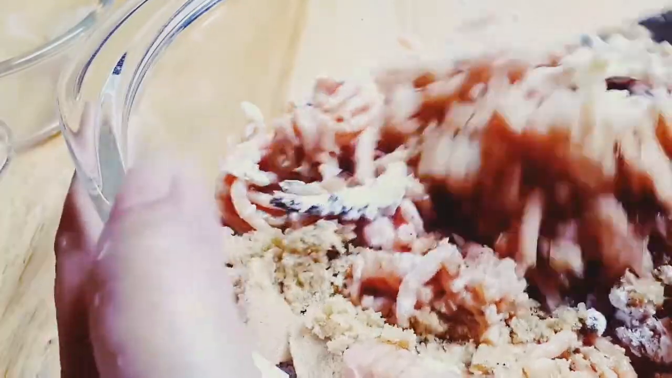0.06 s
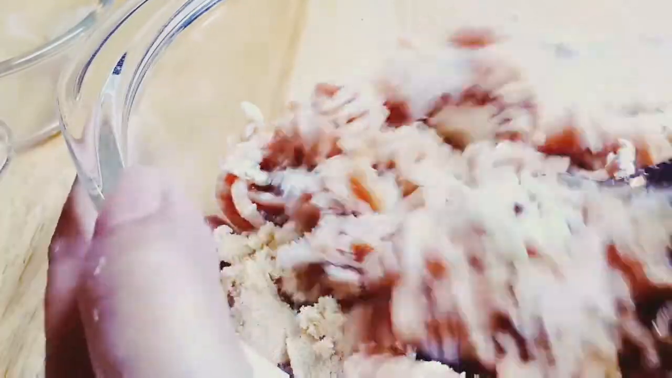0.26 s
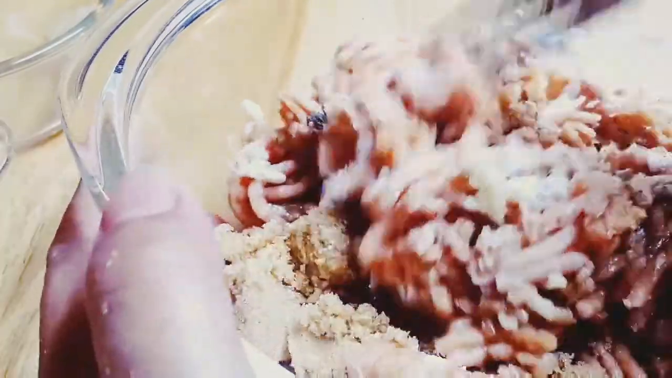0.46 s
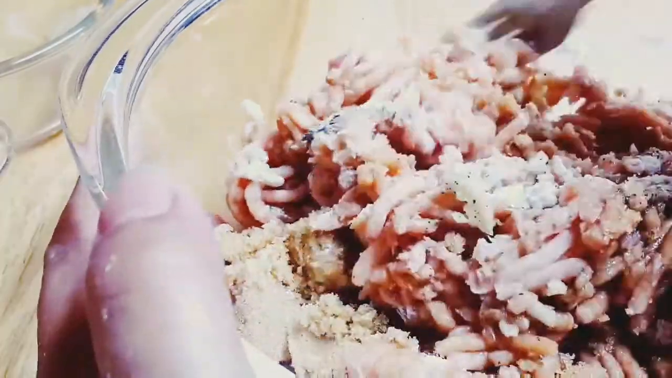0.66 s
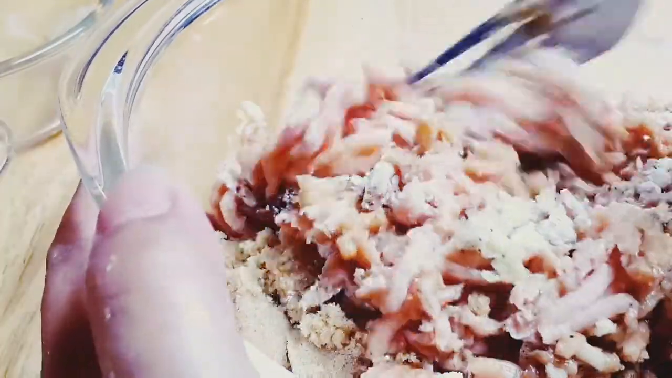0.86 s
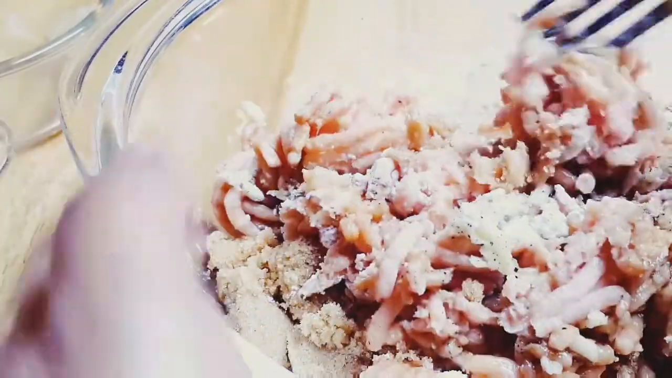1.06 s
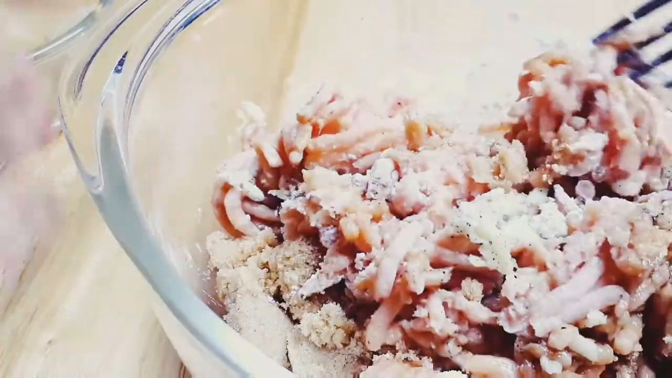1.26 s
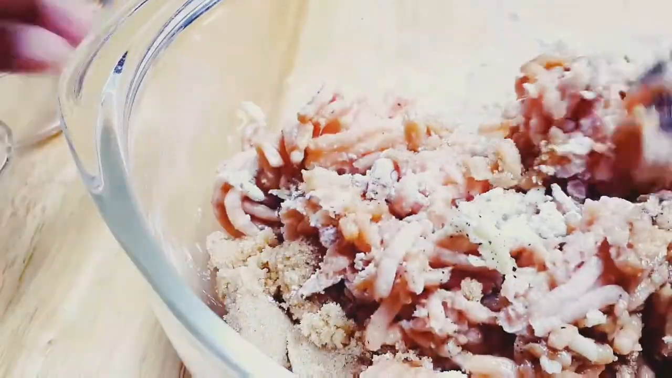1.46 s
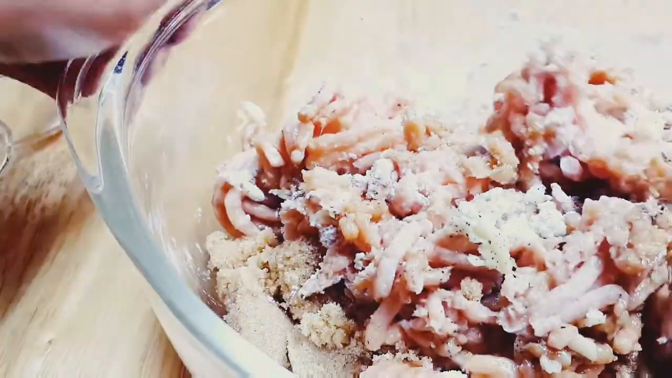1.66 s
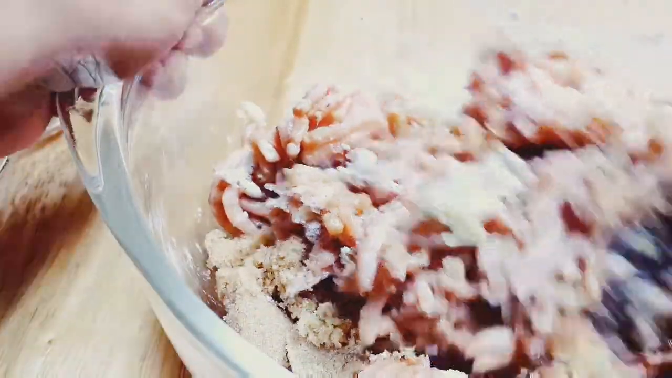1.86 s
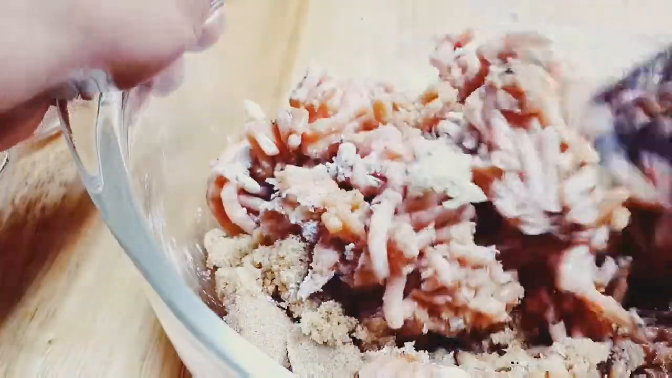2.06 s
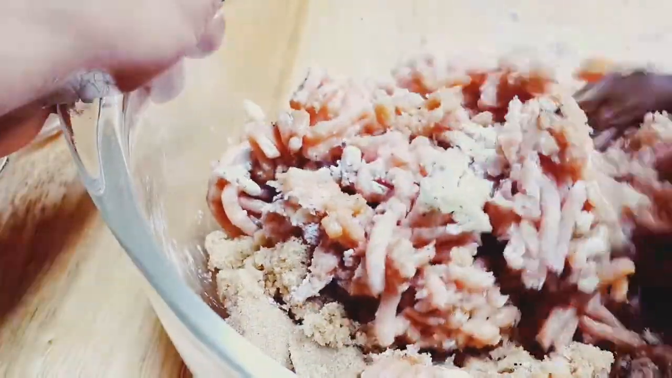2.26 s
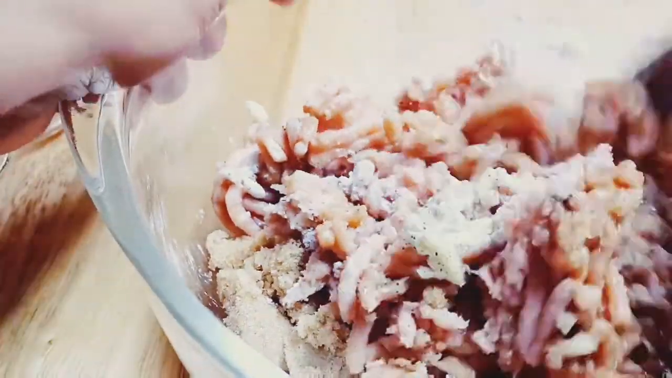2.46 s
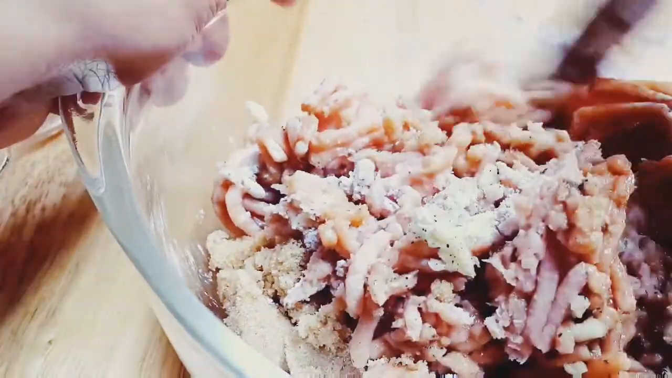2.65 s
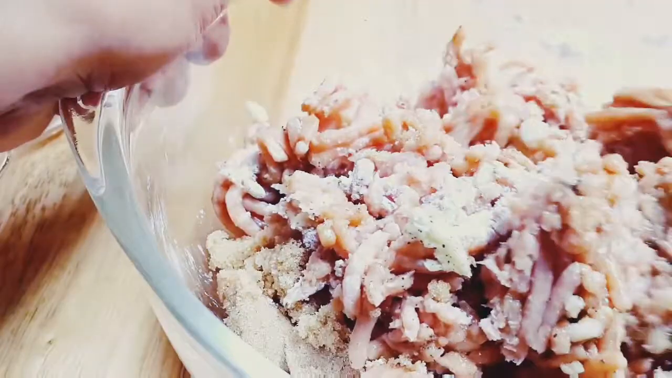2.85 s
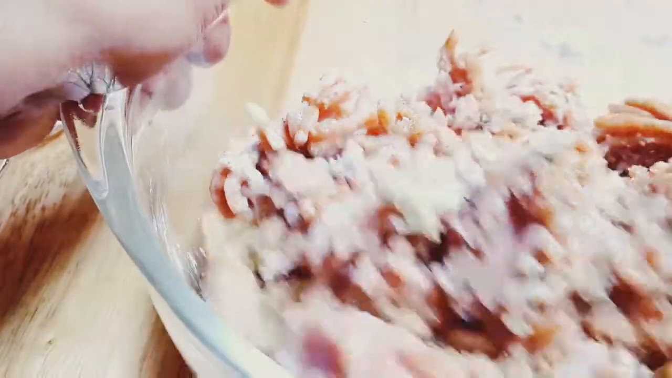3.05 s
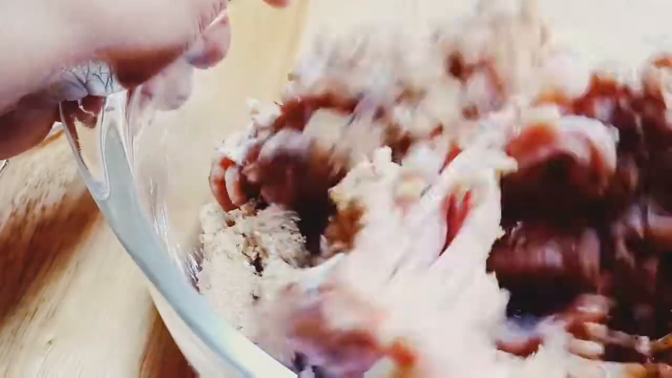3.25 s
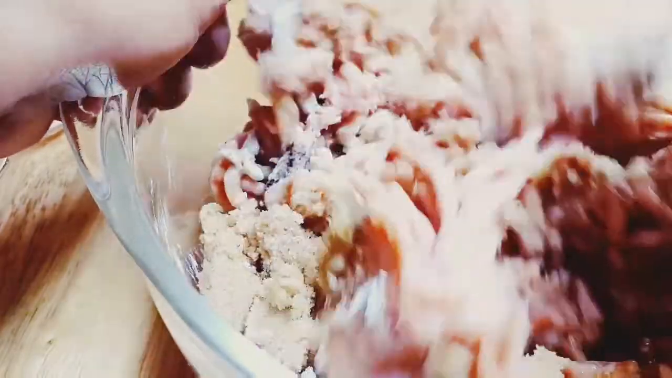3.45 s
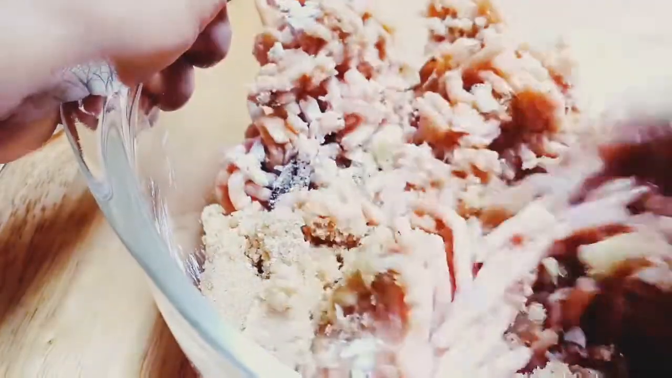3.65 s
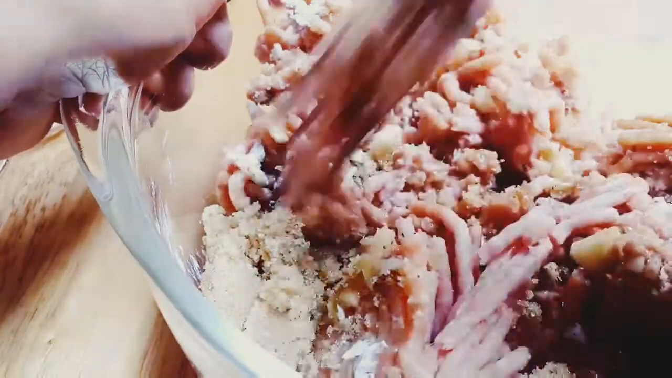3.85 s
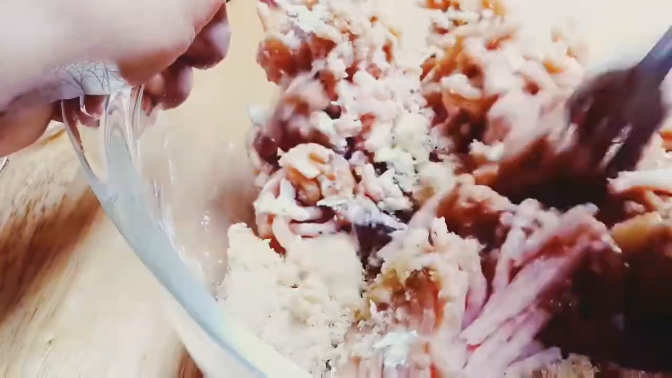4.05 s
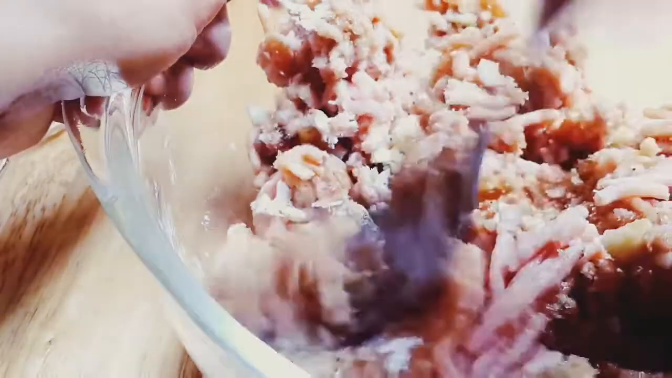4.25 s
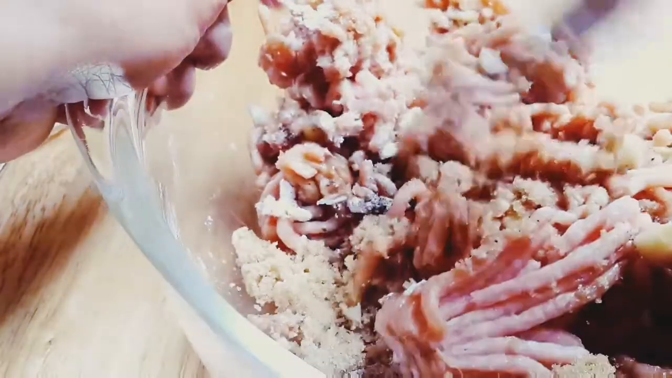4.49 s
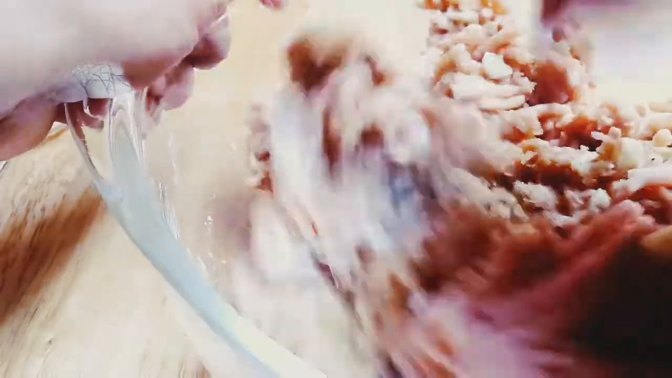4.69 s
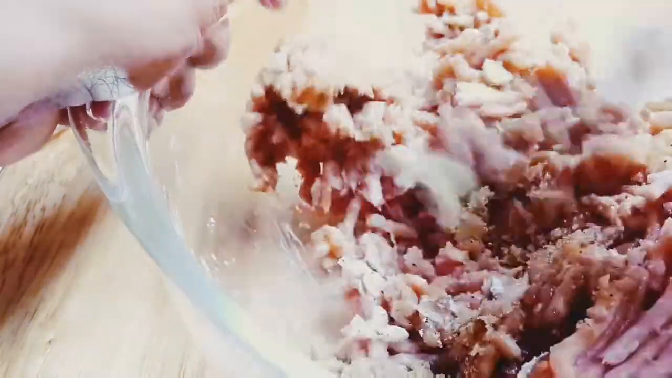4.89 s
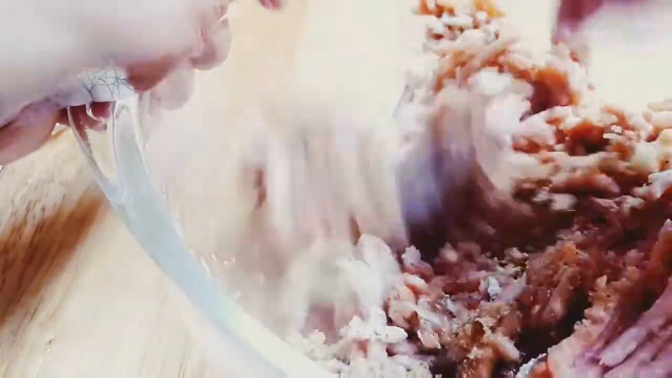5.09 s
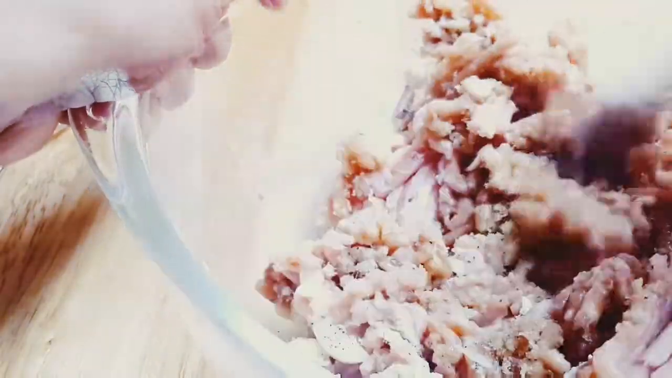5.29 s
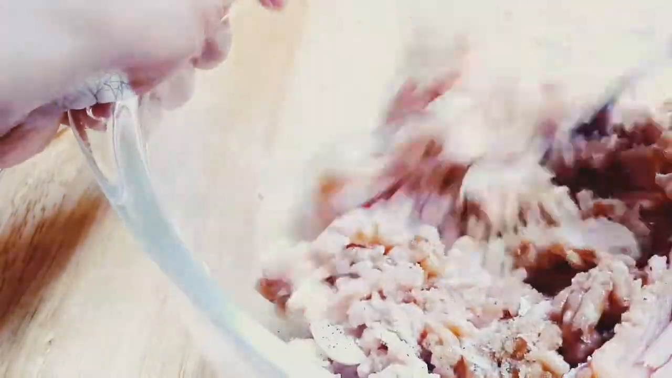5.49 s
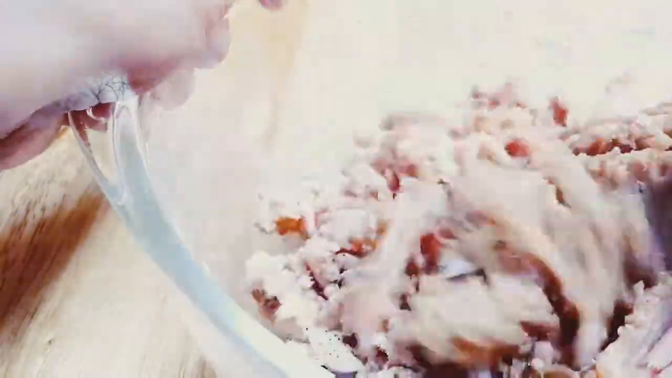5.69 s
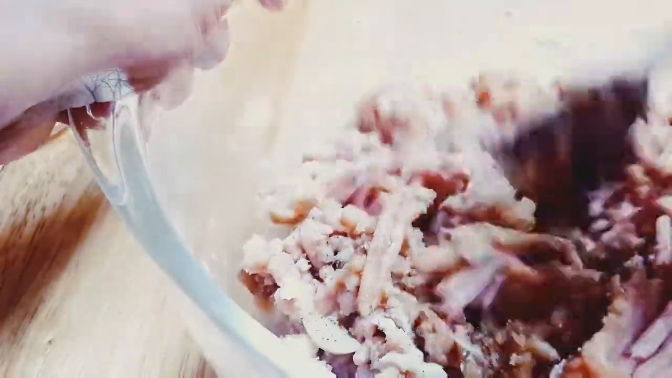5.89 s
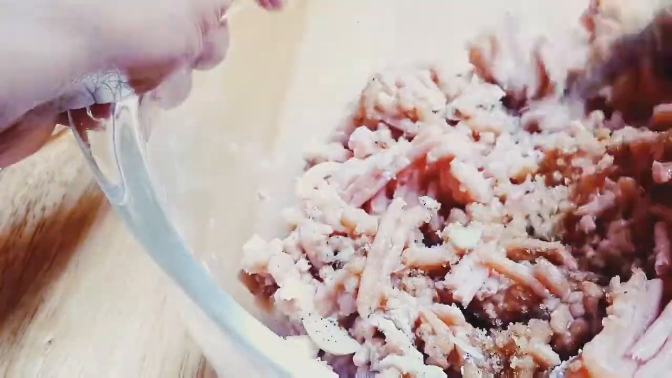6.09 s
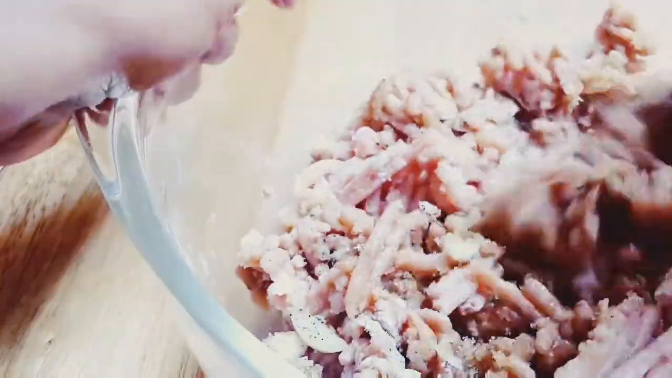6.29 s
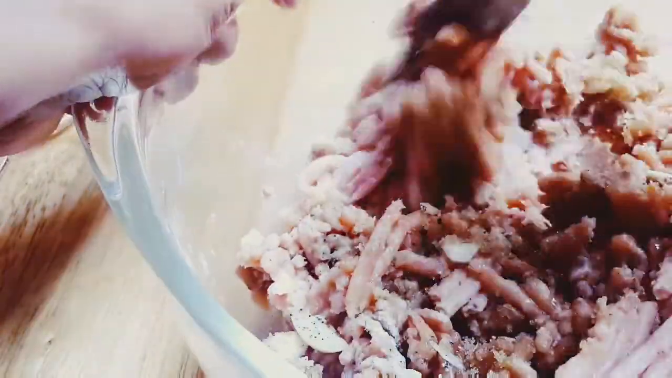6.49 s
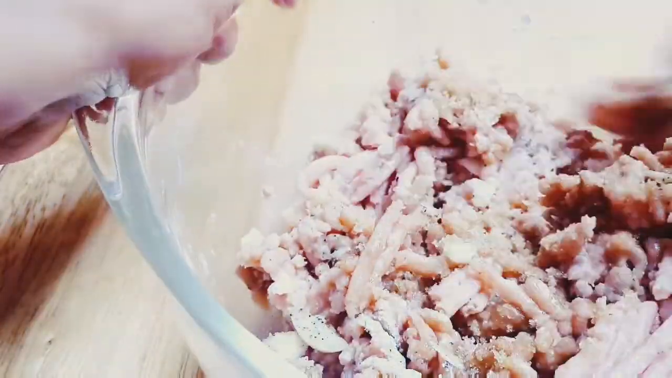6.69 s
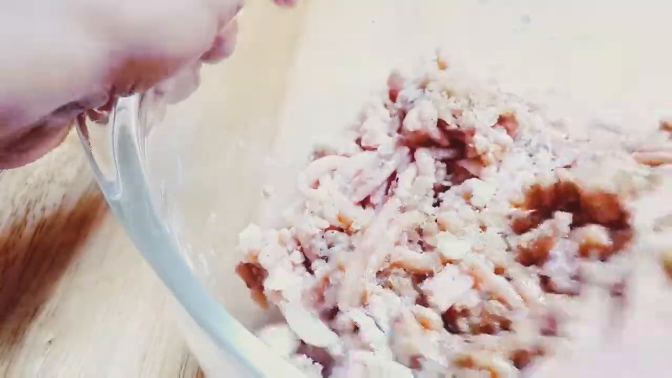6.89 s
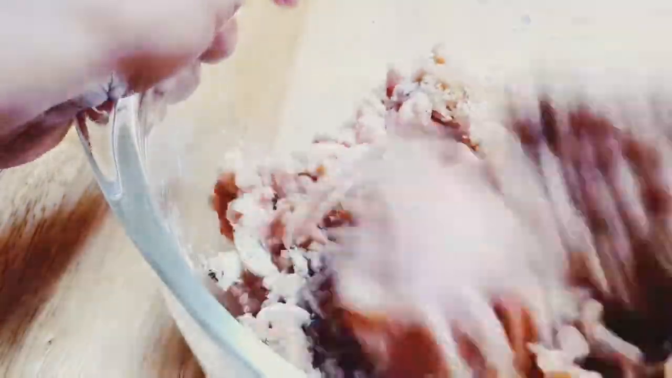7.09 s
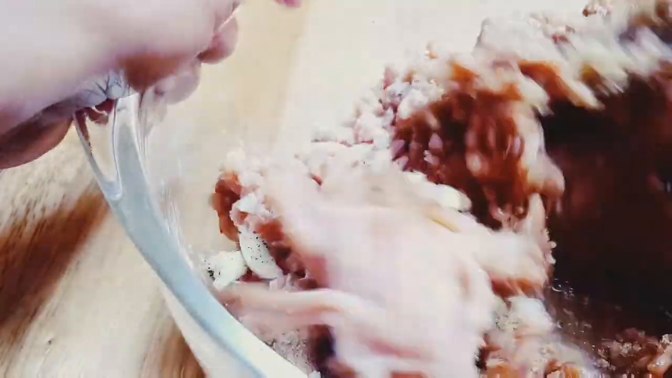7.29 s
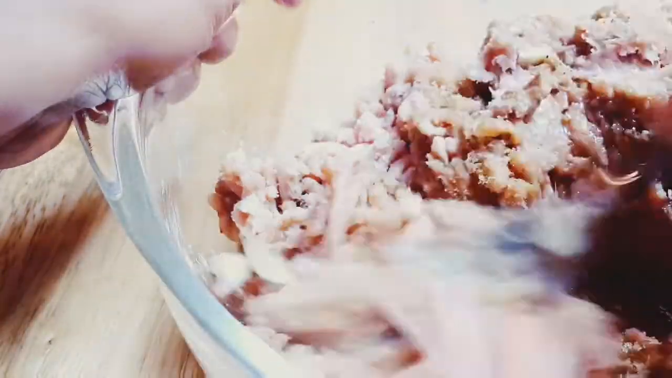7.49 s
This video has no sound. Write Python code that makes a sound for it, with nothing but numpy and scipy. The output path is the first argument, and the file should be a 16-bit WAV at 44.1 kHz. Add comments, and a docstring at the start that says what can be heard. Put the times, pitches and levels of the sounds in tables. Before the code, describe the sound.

Close up in a small, quiet kitchen, a fork stirs wet ground meat in a glass bowl. Uneven strokes make sticky crackles, soft squishes and tiny wet snaps. Through the middle the fork strikes the glass several times, once with a clear ring, and the bowl knocks dully on the wooden table. The squelching grows busier near the end, over a very faint appliance hum.

```python
"""Fork mixing wet mince in a glass bowl

A hand steadies the bowl on a wooden table in a small kitchen. Each stroke crackles as sticky strands
part, snaps wet films and squeezes air out of the meat. The tines click and scrape on the glass, and
the bowl knocks and groans against the wood. An appliance hums faintly behind it all."""
import sys
import numpy as np
from scipy import signal
from scipy.fft import rfft, irfft
from scipy.io import wavfile
from scipy.ndimage import uniform_filter1d

SR = 44100
rng = np.random.default_rng(int(sys.argv[2]) if len(sys.argv) > 2 else 0)


def waveform_to_disk(signal):
    """Save audio, clipped to [-1, 1], as 16-bit WAV at the path in sys.argv[1]."""
    frames = np.transpose(np.atleast_2d(signal))
    scaled = np.clip(frames, -1, 1) * 32767
    samples = np.round(scaled).astype(np.int16)
    wavfile.write(sys.argv[1], SR, samples)


N = 332514
CUTOFF_HZ = 16100

# Fork strokes through the meat: (start [s], length [s], crackle [dB], squish [dB], rumble [dB],
# swell [dB]). Event levels are faders, set ahead of each layer's own gain.
FORK_STROKES = [(0.0, 0.051, -54, -55, -51, -8), (0.056, 0.075, -44, -47, -53, 1),
                (0.146, 0.13, -50.5, -58, -57.5, -2), (0.306, .2, -52.5, -57, -59, -3),
                (0.72, 0.08, -54.5, -56.5, -57, -10), (0.823, 0.12, -50, -55.5, -60, -0.5),
                (1.07, 0.174, -68, -71, -72, -3), (1.884, 0.21, -60, -59.5, -62, 3.5),
                (2.144, 0.18, -59, -66.5, -67.5, 5), (2.34, .17, -48.5, -54, -63, 3.5),
                (2.709, 0.14, -51, -61, -68, 6), (2.894, 0.041, -44, -48.5, -49.5, -9),
                (2.959, 0.16, -47, -52.5, -60, 3.5), (3.156, .13, -50, -51, -64.5, 3.5),
                (3.32, 0.2, -61, -78, -67.5, -2), (3.52, 0.051, -51, -57.5, -65, 3),
                (3.585, 0.056, -46, -40.5, -64, -7), (3.658, .1, -54, -63, -67, -4.5),
                (3.987, .15, -58, -62, -66, 6.5), (4.198, .12, -77.5, -81, -70, -6),
                (4.37, 0.14, -52.5, -56, -55, -13), (4.738, .16, -55.5, -60.5, -69, -3),
                (5.105, 0.1, -57, -63.5, -69.5, 13.5), (5.229, 0.14, -62, -68.5, -70.5, -2.5),
                (5.479, 0.056, -56, -63.5, -69, -2.5), (5.56, 0.11, -46, -55, -66, 0),
                (5.813, 0.28, -52.5, -59.5, -72, 14), (6.189, 0.042, -41.5, -47.5, -52, 0),
                (6.255, 0.14, -48.5, -52, -52, -1.5), (6.519, 0.11, -46, -56, -61.5, 2),
                (6.68, 0.36, -44.5, -47, -49.5, -3), (7.094, 0.11, -44.5, -49, -66.5, 1),
                (7.266, .12, -57.5, -65, -67.5, 2.5), (7.514, .04, -62, -61.5, -67, 1)]
# Fixed low resonances heard in the knocks and judder: (pitch [Hz], level [dB], t60 [s])
KNOCK_RESONANCES = [(192.1, -12.5, 0.28), (228.4, 4.5, 0.048), (269, -5.5, 0.091), (339.7, -0.5, 0.052),
                    (414.5, -7, 0.06), (503.6, -8.5, 0.064), (601, -5, 0.034), (790, -0.5, 0.022),
                    (1047, -8, 0.02), (1257, -14, 0.02)]
# Bright EQ of sticky strands parting: (frequency [Hz], level [dB])
CRACKLE_EQ = [(100, -26.5), (1200, -20), (2500, -15.5), (3500, -7.5), (4300, -3.5), (5400, -4), (6600, 0.5),
              (7250, -1), (8000, -3), (9500, -7.5), (12000, -11), (16000, -20.5)]
# Midrange EQ of wet pockets in the meat: (frequency [Hz], level [dB])
SQUISH_EQ = [(100, -13), (300, -3.5), (550, -18.5), (800, -7), (1100, -6.5), (1450, 1.5), (1900, -2),
             (2350, 0), (2900, -3.5), (3500, -3), (5000, -13)]


def mince(waver_db=1.5, wavers_per_s=25):
    """Strands peel apart with a fine crackle, larger pockets squish, and the moving mass rumbles."""
    # Low body of meat pushed against the bowl: (frequency [Hz], level [dB])
    rumble_eq = [(60, -26.5), (110, -16), (150, -10), (195, 0.5), (280, -10.5), (360, -10), (480, -14.5),
                 (600, -17), (780, -14.5), (1200, -21), (2500, -39)]
    fine_pops = grains(per_s=7000, clump_db=3.3, low_hz=1500, high_hz=15500, cycles=9)
    wet_pops = grains(per_s=2400, clump_db=5, low_hz=448, high_hz=3870, cycles=17)
    rumble = colour(diffuse(N), rumble_eq) * from_db(2 * drift(30))
    pressure = from_db(waver_db * drift(wavers_per_s))
    crackle_gain, squish_gain, rumble_gain = layer_gains(FORK_STROKES) * pressure
    return (from_db(1.47) * rms_one(colour(fine_pops, CRACKLE_EQ)) * crackle_gain
            + from_db(-1.5) * rms_one(colour(wet_pops, SQUISH_EQ)) * squish_gain
            + from_db(-1.2) * rms_one(rumble) * rumble_gain)


def grains(per_s, clump_db, low_hz, high_hz, cycles, spread_db=3.4, wander_db=2.5, spots=14):
    """Clumps of tiny pops; each spot in the bowl has its own pitch, stereo delay and wandering level."""
    born = rng.random(N) < per_s * from_db(clump_db * drift(45)) / SR
    sizes = born * from_db(spread_db * np.minimum(rng.exponential(1, N), 4)) * rng.choice([-1, 1], N)
    spot, out = rng.integers(0, spots, N), np.zeros((2, N))
    for k, hz in enumerate(np.geomspace(low_hz, high_hz, spots)):
        pops = np.diff(ring(sizes * (spot == k), hz, cycles / hz), prepend=0)
        pops = rms_one(pops) * np.sqrt(hz) * from_db(wander_db * drift(40))
        out += [np.roll(pops, lag) for lag in rng.integers(0, 24, 2)]
    return rms_one(out)


def snaps(fade_s=0.0004, cycles=24, size=512):
    """Short rasps with a ping: wet films tearing over tiny air pockets, and one tick of the fork."""
    # The louder wet snaps, and one light tick of the fork on glass:
    # (time [s], level [dB], midrange send [dB], left over right [dB], ping pitch [Hz])
    loud_snaps = [(0.0558, -17, -13, 5.5, 4450), (0.077, -21.5, -16, 5, 7450), (0.1011, -21, -12, 6, 6400),
                  (0.1262, -18.5, -6, 3, 6100), (0.2284, -28, -16, 4, 5900), (0.2411, -25, -15, 3, 6300),
                  (0.476, -35, -16, 0, 7200), (0.5183, -37, -16, -1, 7900), (0.7161, -28, 4, -1, 8000),
                  (0.7877, -33, -14, -1, 6000), (0.8916, -23.5, -2.5, -2, 4700),
                  (1.1726, -29, -13, -3, 8300), (1.4405, -48, -15, -3, 10300), (1.8584, -45.5, 1, 6, 3900),
                  (1.9453, -36, -6, -4, 6900), (2.1472, -27.5, -13, -2, 7400),
                  (2.1738, -29.5, -20, -7, 8400), (2.2556, -26, -20, 2, 6960), (2.3317, -33, -16, 3, 6700),
                  (2.4873, -20, -18, 8, 4900), (2.5116, -26, -18, 1, 6300), (2.5187, -25, -17, -1, 7000),
                  (2.7114, -36.5, -11, 3, 4500), (2.7864, -28, -11, 1, 6800), (2.8902, -25, -8, 0, 6470),
                  (2.9716, -22, -14, -2, 7930), (3.0137, -26.5, -15, -1, 6300), (3.112, -27, -19, -1, 7300),
                  (3.2185, -31, -2, -4, 5900), (3.2377, -25, -15, 3, 6700), (3.2485, -25.5, -14, -4, 7100),
                  (3.2568, -25, -16, -3, 6500), (3.2833, -24, -20, -4, 6300),
                  (3.3651, -36.5, -15, -1, 7300), (3.5556, -24, -6, 8, 6800), (3.7184, -25, -10, 6, 6780),
                  (3.7626, -36.5, -16, 5, 6800), (4.7218, -37.5, -7, 1, 6520), (4.7297, -37, -11, 1, 5400),
                  (4.7559, -31.5, -14, 0, 6600), (5.1393, -37.5, -13, 4, 6800),
                  (5.4823, -38.5, 1.5, 0, 2480), (5.5275, -31, -13, 1, 4300), (5.5385, -31, -18, -2, 7240),
                  (5.564, -22, -17, 1, 7900), (5.6027, -28, -9, -5, 8100), (5.686, -27, -19, -3.5, 6500),
                  (5.8696, -34.5, -13, 5, 7000), (6.0033, -32, -16, 4, 6800), (6.067, -23.5, -20, -1, 7040),
                  (6.1721, -23, -4, -1, 3000), (6.1977, -19.5, -7, -3, 4740), (6.2352, -24, -18, 3, 6900),
                  (6.2482, -27, -6, 1, 5400), (6.2902, -28, -11, -1, 4900), (6.3349, -24, -16, 3, 7640),
                  (6.3575, -20.5, -17, 2, 7300), (6.3759, -21.5, -14, 0, 7100), (6.4064, -26, -16, 5, 6280),
                  (6.5242, -33, -12, -5, 7500), (6.5735, -27, -10, 0, 6700), (6.626, -33, -9, -3, 8400),
                  (6.7126, -22.5, -6, -4, 7950), (6.7897, -21.5, -4, -3, 8100),
                  (7.0876, -25.5, -20, -8, 7500), (7.1144, -28, -1, -8, 4300), (7.1286, -30, -9, -8, 8700),
                  (7.1538, -27, -2, -5, 6200), (7.1707, -26, -13, -4, 6800), (7.2109, -26, -18, -4, 7770),
                  (7.3527, -23, -19, -2, 4900)]
    bright, dull, pings = np.zeros((3, 2, N))
    for s, db, middle_db, pan_db, hz in list(loud_snaps) + small_snaps():
        gain = from_db(db) * panned(pan_db)
        rasp = unit_energy(burst(fade_s, size) * np.arange(size))
        add(bright, s, gain * rasp)
        add(dull, s, gain * rasp * from_db(middle_db))
        add(pings, s, gain * unit_energy(ring(rasp, hz, cycles / hz)))
    return from_db(5.5) * (colour(bright, CRACKLE_EQ) + pings) + from_db(3.5) * colour(dull, SQUISH_EQ)


def small_snaps(per_s=24, boost_db=15.5, middle_db=-13.5, scatter_db=2, pocket_hz=(4020, 8950), count=12):
    """Cues for smaller films that snap at random within the strokes, following the crackle's level."""
    cues = []
    for start, length, crackle_db, _, _, swell_db in FORK_STROKES:
        ages = np.cumsum(rng.exponential(1, count)) / per_s
        pitches = rng.uniform(*pocket_hz, count)
        scatter = scatter_db * rng.standard_normal((count, 2))
        for age, hz, (size_db, pan_db) in zip(ages, pitches, scatter):
            if age < length:
                db = crackle_db + swell_db * (age / length - .5) + boost_db + size_db
                cues.append((start + age, db, middle_db, pan_db, hz))
    return cues


def squirts(cycles=29):
    """Escaping air sputters through a small cavity in the meat."""
    # Puffs of squeezed air: (time [s], level [dB], pitch [Hz], length [s])
    puffs = [(0.078, -42, 2310, 0.0082), (2.454, -45, 2410, 0.0049), (3.03, -63, 1445, .24),
             (3.157, -48.5, 1500, 0.0049), (3.158, -48, 2400, 0.0025), (3.194, -51, 1500, 0.0048),
             (3.217, -50.5, 1690, .004), (3.236, -51, 1500, .004), (3.584, -41, 1500, .005),
             (3.588, -39.5, 2450, 0.054), (4.259, -60, 1186, 0.0072), (6.186, -46.5, 1890, .006),
             (6.191, -40.5, 4850, 0.011), (6.194, -45, 1550, .009), (6.194, -47.5, 2280, .008),
             (6.272, -53.5, 767, 0.082), (6.661, -54, 723, 0.098), (6.705, -46, 1640, 0.067),
             (6.778, -49, 2200, 0.031), (6.878, -52, 2150, 0.042), (6.886, -53.5, 790, 0.079),
             (6.955, -42, 1500, 0.0047), (6.959, -50.5, 1446, 0.057), (7.102, -49, 1470, 0.0067)]
    out = np.zeros((2, N))
    for s, db, hz, length in puffs:
        size = int(length * SR)
        puff = np.pad(rng.standard_normal((2, size)) * np.hanning(size), ((0, 0), (0, 512)))
        cavity = ring(puff + puff[::-1] / 2, hz, cycles / hz)  # crossfeed narrows the image
        add(out, s, from_db(db) * rms_one(cavity))
    return out


def fork_on_glass(fade_s=0.0022):
    """A hard crack of steel on glass; each hit has its own amount of ring."""
    # Tine hits: (time [s], level [dB], left over right [dB], ring send [dB])
    clinks = [(2.067, -34.5, 0, 1), (2.3408, -19.5, 2, -24.5), (2.7473, -22, 0.5, -12.5),
              (3.566, -14.5, -1, -8.5), (4.354, -12.5, 3, 15), (4.7857, -33, -0.5, 0)]
    # Resonances of the glass: (pitch [Hz], level [dB], t60 [s])
    glass_modes = [(594, -14, 0.082), (1660, -9.5, 0.24), (2725, -17.5, .13), (2902, -14.5, 0.17),
                   (3790, -22, 0.119), (4220, -18, 0.14), (4290, -16, 0.149), (5970, -16, 0.12),
                   (6380, -9.5, .13), (6640, -9.5, .13), (6740, -8, .2), (7000, -14.5, 0.15),
                   (7520, -11.5, .13), (7897, -13, 0.13), (8260, -16, 0.15)]
    # Brittle EQ of the attack: (frequency [Hz], level [dB])
    crack_eq = [(300, -17), (1000, -11.5), (2800, -5), (3500, -9), (4250, -3.5), (4600, -11.5),
                (5600, -10.5), (6600, 4.5), (7250, -2), (7900, 2), (9500, -10.5), (12000, -13.5),
                (16000, -21)]
    cracks, blows, rings = np.zeros((2, N)), np.zeros(N), 0
    for s, db, pan_db, ring_db in clinks:
        add(cracks, s, burst(fade_s) * from_db(db) * panned(pan_db))
        add(blows, s, from_db([db + ring_db]))
    for hz, db, t60 in glass_modes:
        mode = from_db(db) * ring(blows, hz, t60)
        rings = rings + np.array([np.roll(mode, lag) for lag in rng.integers(0, 10, 2)])
    return from_db(20) * colour(cracks, crack_eq) + from_db(-25) * rings


def scrapes(slips_per_s=1200):
    """Tines stick and slip along the glass; the bowl sings over a low judder."""
    # Drags over bare glass: (start [s], length [s], low note [dB], middle note [dB], squeak [dB],
    # judder [dB], swell [dB])
    drags = [(.135, 0.047, -61, -72, -78, -66, -5), (0.32, 0.13, -54, -55.5, -67, -54.5, -4),
             (1.054, .012, -68.5, -82, -80, -67, -6), (1.08, 0.17, -81, -83, -70, -76, -2),
             (1.862, 0.15, -59.5, -72, -76, -51.5, 0.5)]
    slips = (rng.random((2, N)) < slips_per_s / SR) * rng.standard_normal((2, N))
    judder = sum(ring(slips[0], hz, t60) * from_db(db / 2) for hz, db, t60 in KNOCK_RESONANCES)
    low_gain, middle_gain, squeak_gain, judder_gain = layer_gains(drags)
    return (sing(slips[0], hz=1665) * low_gain
            + sing(slips, hz=2710) * middle_gain
            + sing(slips, hz=5800) * squeak_gain
            + rms_one(thin_bass(judder)) * judder_gain)


def sing(slips, hz, t60=0.16):
    """Friction keeps a glass mode going at a fairly even strength."""
    note = ring(slips, hz, t60)
    return rms_one(note / np.sqrt(uniform_filter1d(note ** 2, size=400) + 1e-9))


def knocks(split_hz=480, detune=0.037, chatter_s=0.011, rebounds_per_s=500, size=12000):
    """The bowl rocks onto the table and chatters to rest; each knock rings at slightly new pitches."""
    # Glass landing on wood: (time [s], level [dB], hardness [dB], chatter [dB])
    landings = [(0.038, -45.5, 5.5, -11), (0.355, -33.5, -12, -23), (0.718, -31.5, -6, 1.5),
                (0.735, -28.5, -3, -5), (1.859, -51, 1, -3), (2.07, -36, 4, -11.5), (2.34, -26, -31, -15),
                (2.402, -41.5, 5, -5.5), (2.524, -40, -4, -18), (2.746, -15.5, -16, -6),
                (2.757, -19, -29, -11), (3.565, -28.5, -15, -17), (4.353, -24.5, -0.5, 3),
                (4.372, -29.5, -2.5, 0), (4.39, -26, -2.5, -0.5), (4.786, -36, -8.5, -2.5),
                (4.84, -24.5, -4, -1.5), (6.172, -26.5, -17, -2.5), (6.655, -36, -12, -1)]
    out, age = np.zeros((2, N)), np.arange(size) / SR
    blow = age == 0
    for s, db, hard_db, chatter_db in landings:
        rebounds = rng.standard_normal((2, size)) * (rng.random(size) < rebounds_per_s / SR)
        rebounds *= np.exp(-age / chatter_s)
        rebounds *= from_db(chatter_db) / (np.linalg.norm(rebounds, axis=1, keepdims=True) + 1e-9)
        # low modes sit in the centre; hard contacts bring out the upper modes, which spread wide
        soft = blow + from_db(-1.5) * rebounds[0]
        hard = from_db(hard_db + 3) * (blow * panned(rng.uniform(-1, 1)) + from_db(7.5) * rebounds)
        for hz, mode_db, t60 in KNOCK_RESONANCES:
            pitch = hz * np.exp(detune * rng.normal())
            add(out, s, from_db(db + mode_db) * ring(hard if hz > split_hz else soft, pitch, t60))
    return from_db(-5.5) * thin_bass(out)


def thin_bass(x, edge_hz=172):
    """A small table radiates little deep bass."""
    return signal.sosfilt(signal.butter(5, edge_hz, "high", fs=SR, output="sos"), x)


def groans(waver=0.0256, flutter_db=2.5):
    """The pushed bowl creeps over the wood with a low, wavering note that glides with the pressure."""
    # Rubs of the bowl's foot: (start [s], length [s], level [dB], first pitch [Hz], last pitch [Hz])
    rubs = [(0.105, 0.072, -43, 247.4, 203), (0.357, 0.059, -46, 200, 209), (1.055, .01, -54.5, 216, 201),
            (2.862, 0.011, -36.5, 200, 186), (2.898, 0.047, -48, 188, 186), (6.668, .012, -42, 204.3, 187),
            (6.704, 0.052, -46, 205, 215), (6.834, .012, -45, 214.7, 205.4)]
    out, unsteady = 0, 1 + waver * drift(92.5)
    for start, length, db, first_hz, last_hz in rubs:
        pitch = np.interp(np.arange(N) / SR, [start, start + length], [first_hz, last_hz]) * unsteady
        out = out + from_db(db) * gesture(start, length) * np.sin(2 * np.pi * np.cumsum(pitch) / SR)
    return out * from_db(flutter_db * drift(86.2))


def kitchen(x, predelay_s=0.002, size=20000):
    """Dense reflections from near walls, each band dying at its own rate."""
    # Reverb time of the room: (frequency [Hz], t60 [s])
    decay_times = [(150, 0.38), (500, 0.2153), (2000, 0.24), (7000, 0.27), (15000, 0.27)]
    # Tone of the reflections: (frequency [Hz], level [dB])
    reverb_eq = [(150, -13), (280, -5.5), (550, 1.5), (2000, -2.5), (7000, -6.5), (15000, -5.5)]
    t, noise, tail = np.arange(size) / SR, diffuse(size), 0
    edges = np.geomspace(150, CUTOFF_HZ, 9)
    for low, high in zip(edges, edges[1:]):
        hz = np.sqrt(low * high)
        fade = from_db(-60 * t / at_hz(decay_times, hz)) * (t > predelay_s)
        band = signal.sosfilt(signal.butter(2, [low, high], "band", fs=SR, output="sos"), noise)
        tail = tail + band * fade / np.linalg.norm(fade) * from_db(at_hz(reverb_eq, hz))
    return signal.oaconvolve(x, tail, axes=1)[:, :N]


def room_tone(hum_hz=119.8, hum_db=-70.5, hiss_db=-67):
    """Mains hum of an appliance over faint hiss."""
    # Tone of the hiss: (frequency [Hz], level [dB])
    hiss_eq = [(25, -17.5), (45, -23), (90, -15.5), (200, -17.5), (400, -17), (1000, -22), (3000, -24),
               (7000, -25.5), (12000, -28), (16000, -28.5)]
    hum = np.sqrt(2) * from_db(hum_db) * np.sin(2 * np.pi * hum_hz * np.arange(N) / SR)
    return hum + from_db(hiss_db) * colour(diffuse(N), hiss_eq)


def diffuse(size):
    """Stereo noise, narrow in the bass and wide in the treble."""
    # Likeness of left and right in the room: (frequency [Hz], correlation [ratio])
    likeness = [(40, 0.44), (130, 0.62), (290, 0.98), (640, 0.066), (1400, 0.052), (3000, 0.25),
                (15000, 0.096)]
    mid, side = rfft(rng.standard_normal((2, size)))
    alike = at_hz(likeness, np.fft.rfftfreq(size, 1 / SR))
    return irfft(np.sqrt(1 + alike) * mid + np.sqrt(1 - alike) * side * [[1], [-1]], size) / np.sqrt(2)


def hush(x, below_db, depth_db, slope=0.47, above_hz=400):
    """A gentle expander: everything above the bass dips a little whenever it is faint."""
    bass = signal.sosfilt(signal.butter(1, above_hz, fs=SR, output="sos"), x)
    upper = x - bass
    level_db = 10 * np.log10(uniform_filter1d(np.mean(upper ** 2, axis=0), size=600) + 1e-14)
    return bass + upper * from_db(np.clip(slope * (level_db - below_db), -depth_db, 0))


def gesture(start, length, swell_db=0, brush_db=-9.5, brush_s=0.029, bite_s=0.017, settle_s=0.018):
    """Envelope of one push: a light brush, a quick bite, a hold that swells or sags, then settling."""
    age = np.arange(N) / SR - start
    brush = from_db(brush_db) * np.exp(np.clip(age / brush_s, -20, 0))
    rise = np.maximum(brush, np.clip(1 + age / bite_s, 0, 1) ** 2)
    release = np.exp(-np.clip((age - length) / settle_s, 0, 20))
    return rise * release * from_db(swell_db * (np.clip(age / length, 0, 1) - .5))


def layer_gains(events):
    """One envelope per layer, from rows of (start [s], length [s], each layer [dB], swell [dB])."""
    levels = from_db([row[2:-1] for row in events])
    return levels.T @ np.array([gesture(row[0], row[1], row[-1]) for row in events])


def burst(fade_s, size=1024):
    """A tiny rupture or contact: fading noise, different on each side, with unit energy."""
    return unit_energy(rng.standard_normal((2, size)) * np.exp(-np.arange(size) / (fade_s * SR)))


def ring(x, hz, t60):
    """A resonator: a unit click starts a decaying sine of height about 1."""
    r, w = from_db(-60 / (t60 * SR)), 2 * np.pi * hz / SR
    return signal.lfilter([0, np.sin(w)], [1, -2 * r * np.cos(w), r * r], x + 1e-18)


def colour(x, spectrum, size=4096):
    """Minimum-phase EQ with the given curve and unit energy."""
    cepstrum = irfft(np.log(from_db(at_hz(spectrum, np.fft.rfftfreq(size, 1 / SR)))))
    causal = (np.arange(size) > 0) & (np.arange(size) < size // 2)
    response = irfft(np.exp(rfft(2 * cepstrum * causal)))
    return signal.oaconvolve(x, response[None] / np.linalg.norm(response), axes=1)[:, :x.shape[1]]


def drift(rate):
    """Random modulation at rms 1, turning `rate` times a second."""
    knots = rng.standard_normal(int(N / SR * rate) + 2)
    return rms_one(np.interp(np.arange(N) / SR * rate, np.arange(len(knots)), knots))


def at_hz(points, hz):
    """Read a curve on a log-frequency axis."""
    f, value = np.transpose(points)
    return np.interp(np.log(np.maximum(hz, 1)), np.log(f), value)


def add(track, s, sound):
    """Mix a sound in at time s."""
    start = max(round(s * SR), 0)
    part = track[..., start:start + sound.shape[-1]]
    part += sound[..., :part.shape[-1]]


def panned(db):
    """Left and right gains for a level difference."""
    return from_db(np.array([[db], [-db]]) / 2)


def from_db(db):
    """Decibels to gain."""
    return 10 ** (np.asarray(db) / 20)


def rms_one(x):
    """Scale to rms 1."""
    return x / np.sqrt(np.mean(x ** 2) + 1e-20)


def unit_energy(x):
    """Scale each channel to energy 1."""
    return x / np.linalg.norm(x, axis=1, keepdims=True)


def scene():
    """Meat, fork and bowl, with their kitchen reverb, over the room tone."""
    bowl = mince() + squirts() + fork_on_glass() + scrapes() + groans() + knocks() + snaps()
    return bowl + kitchen(bowl) + room_tone()


def record(dry):
    """Pauses are hushed, the loudest peaks are rounded and the top is cut steeply."""
    hushed = hush(dry, below_db=-59, depth_db=5.5)
    rounded = .8 * np.tanh(hushed / .8)
    return signal.sosfilt(signal.ellip(10, .2, 80, CUTOFF_HZ, fs=SR, output="sos"), rounded)


dry = scene()
out = record(dry)
waveform_to_disk(out)
```